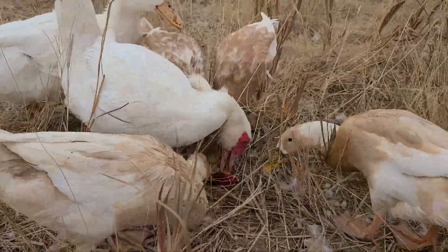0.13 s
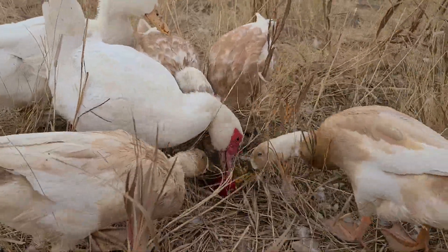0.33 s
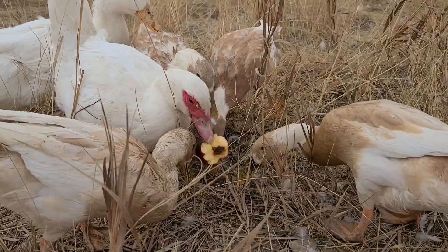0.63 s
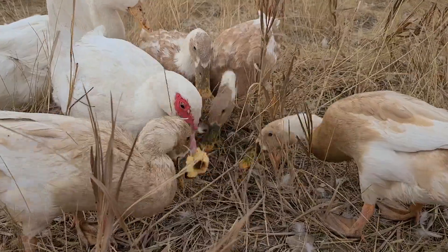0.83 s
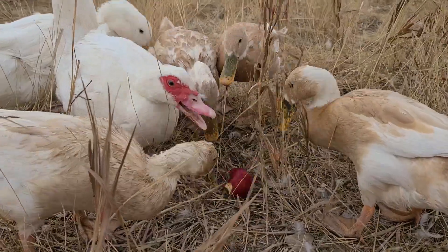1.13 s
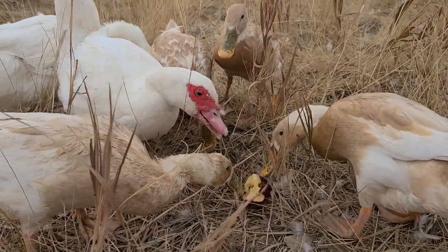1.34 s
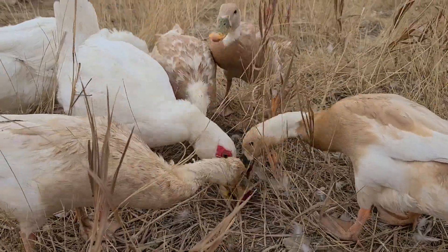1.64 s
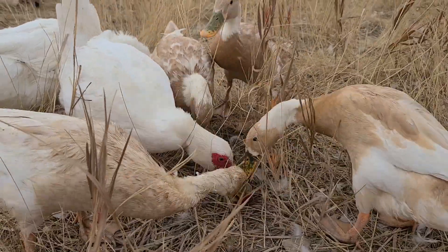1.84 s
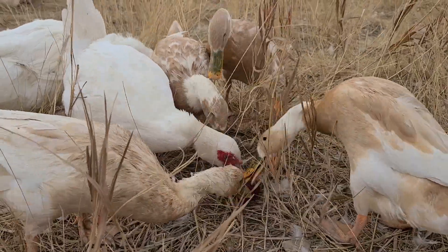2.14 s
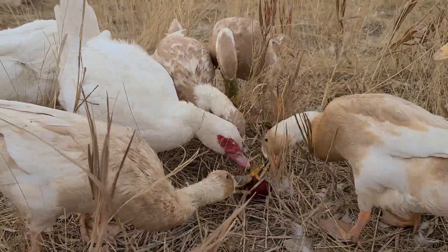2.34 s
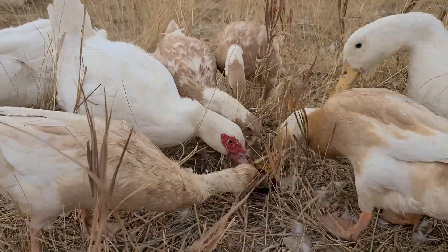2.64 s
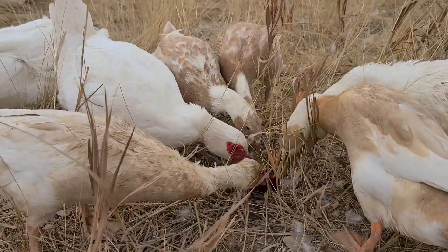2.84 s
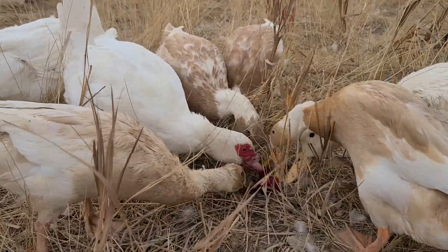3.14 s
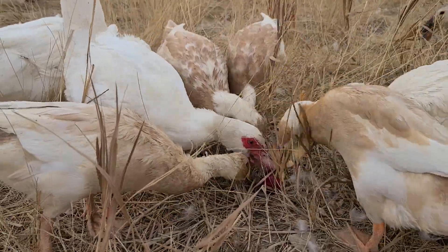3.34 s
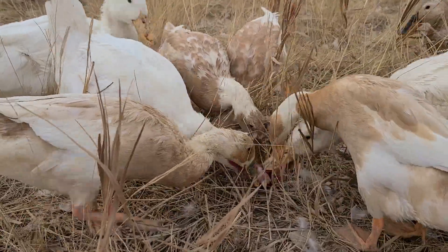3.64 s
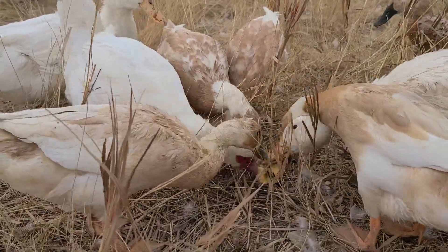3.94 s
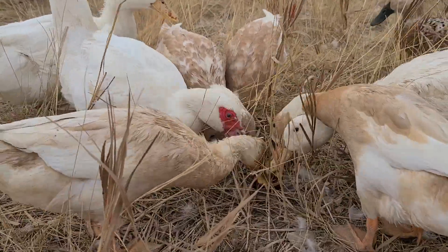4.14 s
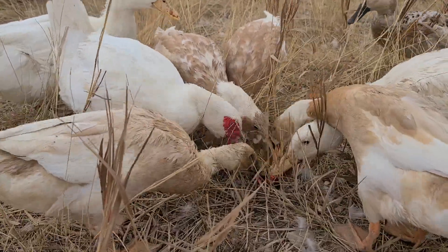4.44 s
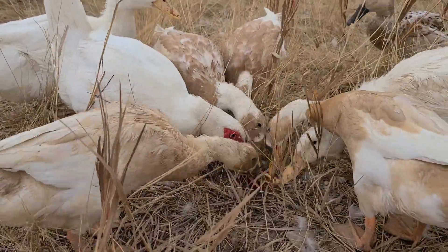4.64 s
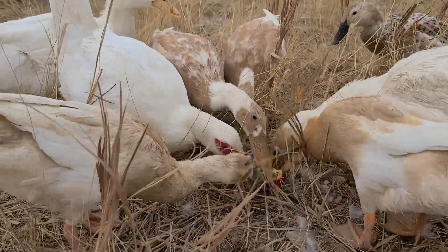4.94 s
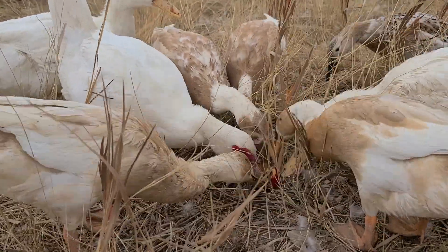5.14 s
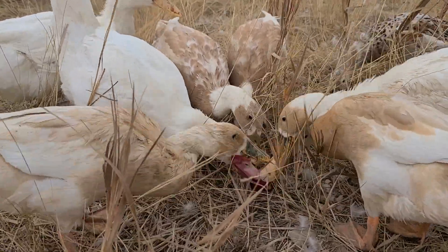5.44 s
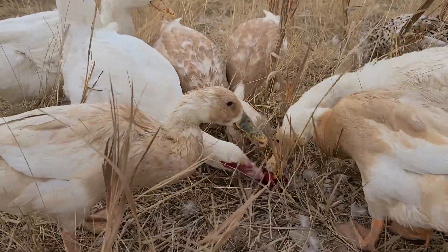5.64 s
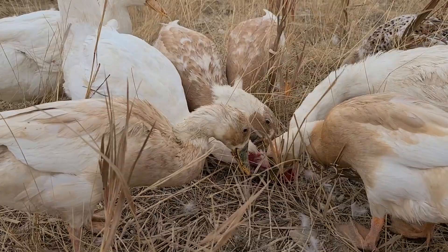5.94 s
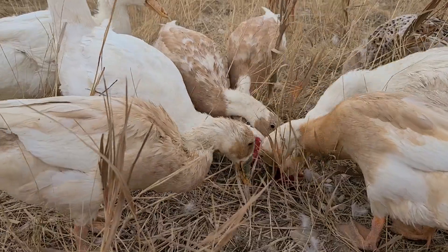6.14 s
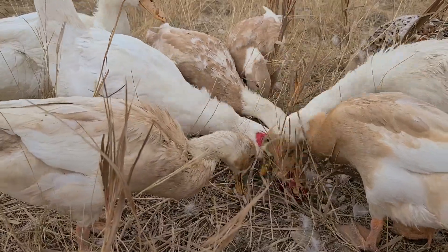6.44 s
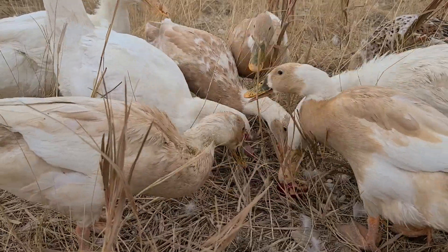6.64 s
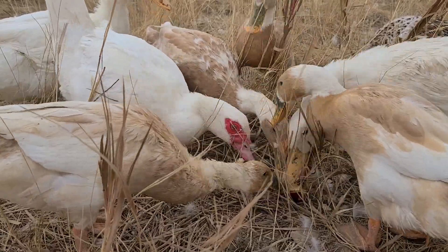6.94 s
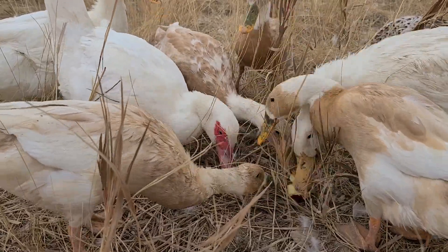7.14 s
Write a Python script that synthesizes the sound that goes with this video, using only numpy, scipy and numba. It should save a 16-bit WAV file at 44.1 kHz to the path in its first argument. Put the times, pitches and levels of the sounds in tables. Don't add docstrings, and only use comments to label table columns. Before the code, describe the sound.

About seven seconds of ducks feeding in dry grass, heard close up in stereo outdoors. Strong deep, buzzing quacks open at 0.1 and 0.26 seconds, followed by mellower ones at 0.33 and 0.77. A cracked, higher quack comes near 1.1, then sharp loud ones at 1.3 and 1.6. From 1.9 to 3.4 the calls are mostly small gliding whistles, faint quacks and hoarse, breathy rasps. Mellow quacks return around 3.6, 3.9, 4.4 and 4.7, then at 5.1, 5.6 and 6.0, with a brief one near 7.0. Throat pops, pecks and bill claps tick throughout. Straw rustles in bursts, busiest around 4.7 to 5.2, with crisp snaps clustered near 3.7 to 4.1. Low wind buffeting starts about 1.3, leaning left, grows across both sides, peaks at 4.5 and 5.0, and weakens after 6. Distant wheezy birds and soft field murmur remain underneath.

```python
import sys
import numpy as np
from scipy import signal
from scipy.fft import rfft, irfft
from scipy.io import wavfile
from scipy.ndimage import uniform_filter1d
from numba import njit

SR = 44100
rng = np.random.default_rng(int(sys.argv[2]) if len(sys.argv) > 2 else 0)


def invert_db(level):
    return 10 ** (np.asarray(level, dtype=float) / 20)


def wav_out(sig):
    wavfile.write(sys.argv[1], SR, np.round(np.clip(np.atleast_2d(sig).T, -1, 1) * 32767).astype(np.int16))


N = 321489


def level(x, db):
    return x * invert_db(db) / np.sqrt(np.mean(x ** 2))


@njit
def svf(x, hz, width):
    y, b, l = np.empty(len(x)), 0., 0.
    g, k = np.tan(np.pi * hz / SR), width / hz
    for i in range(len(x)):
        v = (b + g * (x[i] - l)) / (1 + g * (g + k))
        b, l, y[i] = 2 * v - b, l + 2 * g * v, k * v
    return y


def cascade(x, *bands):
    for hz, width_hz in bands:
        x = svf(x, float(hz), float(width_hz))
    return x


def resonate(x, modes):
    out = 0
    for k, (hz, width_hz, db) in enumerate(modes):
        out = out + (-1) ** k * invert_db(db) * cascade(x, (hz, width_hz))
    return out


def walk(rate_hz, size=N):
    k = int(SR / rate_hz)
    steps = np.repeat(rng.standard_normal(size // k + 1), k)
    return 1.6 * uniform_filter1d(uniform_filter1d(steps, k), k)[:size]


def colour(x, spectrum):
    hz, db = np.transpose(spectrum)
    bins_hz = np.arange(N // 2 + 1) * SR / N
    return irfft(rfft(x) * invert_db(np.interp(np.log(bins_hz + 1), np.log(hz), db)), N)


def add(out, start, x, lag, pan_db):
    size = min(len(x), N - start)
    late = np.interp(np.arange(size) - lag, np.arange(size), x[:size], left=0)
    out[:, start:start + size] += [x[:size] * invert_db(pan_db / 2), late * invert_db(-pan_db / 2)]


def swell(length_s, peak, size=5000):
    u = np.clip(np.arange(size) / (length_s * SR), 0, 1)
    peak = np.clip(peak, .05, .95)
    return u, np.sin(np.pi / 2 * np.where(u < peak, u / peak, (1 - u) / (1 - peak)))


def glide(u, first_hz, middle_hz, last_hz):
    return first_hz * (1 - u) * (1 - 2 * u) + 4 * middle_hz * u * (1 - u) + last_hz * u * (2 * u - 1)


def surges(times, peaks_db, rest_db, rise_db_s, fall_db_s):
    t = np.arange(0, N / SR + .01, .002)
    away = t[:, None] - np.array(times)
    db = np.array(peaks_db) + np.where(away < 0, rise_db_s * away, -fall_db_s * away)
    power = invert_db(rest_db) ** 2 + np.sum(invert_db(db) ** 2, axis=1)
    return np.interp(np.arange(N) / SR, t, 10 * np.log10(power))


def gusts_db():
    # peak t/s, left port level/dB, right port level/dB
    gusts = [(1.32, -37, -53), (1.58, -29, -41), (1.72, -33.5, -57), (1.94, -35, -44), (2.1, -32, -47),
             (2.26, -32, -30), (2.39, -28, -30.5), (2.53, -34.5, -36), (2.69, -29.5, -28.5),
             (2.96, -29.5, -37), (3.23, -39.5, -80), (3.5, -34, -35), (3.6, -27, -29), (3.72, -31, -30),
             (3.97, -29.5, -27.5), (4.11, -32, -30), (4.22, -27, -29), (4.471, -23, -24),
             (4.75, -33.5, -42), (4.9, -34, -33.5), (5.038, -22.5, -20.5), (5.24, -33, -38),
             (5.56, -30, -34.5), (5.85, -31, -29.5), (6.07, -33, -62), (6.2, -33.5, -41), (6.54, -45, -43),
             (6.96, -36.5, -52), (7.04, -50, -42), (7.13, -33.5, -58)]
    s, *ports_db = np.transpose(gusts)
    return np.array([surges(s, db, rest_db=-49.5, rise_db_s=200, fall_db_s=190) for db in ports_db])


def wind():
    # f/Hz, density/dB
    eddy_spectrum = [(12, -51), (20, -13), (54, -2.5), (85, -5.5), (115, -14), (182, -22), (255, -25),
                     (500, -30), (650, -68), (1100, -120)]
    db = gusts_db()
    eddies = level(colour(rng.standard_normal((2, N)), eddy_spectrum), 0.83)
    eddies = eddies / uniform_filter1d(eddies ** 2, size=3000) ** .25
    throb = invert_db(db + 2.5 * np.array([walk(12), walk(12)]))
    return colour(eddies * throb, [(110, 1.5), (300, -14.5)])


def field():
    # f/Hz, density/dB
    murmur_spectrum = [(71, -10), (120, 5), (217, 6.5), (361, -6), (471, -2), (1090, -7), (2370, -17.5),
                       (3490, -10), (5140, -23.5), (7130, -19.5), (11900, -19.5), (15800, -37)]
    murmur_db, follow_db_per_db = -55.5, 0.17
    mid, side = rng.standard_normal((2, N))
    breeze_db = np.mean(gusts_db(), axis=0)
    breeze_db = breeze_db - np.mean(breeze_db)
    side = colour(side, [(300, -17.5), (1400, -1.0)])
    murmur = colour(np.array([mid + side, mid - side]), [(60, -77)] + list(murmur_spectrum))
    return level(murmur, murmur_db + 3) * invert_db(1.5 * walk(6) + follow_db_per_db * breeze_db)


def far_flock():
    voices = []
    for hz in (1100, 1300, 1550):
        voices.append(cascade(rng.standard_normal(N), (hz, 120)) * invert_db(4 * walk(14)))
    return level(np.array([voices[0] + voices[1], voices[1] + voices[2]]), -63.5)


def straw():
    # peak t/s, level/dB
    stirs = [(.3, -50), (.65, -45.5), (1.13, -47.5), (1.34, -55), (1.61, -42.5), (1.99, -76), (2.16, -43.5),
             (2.5, -49.5), (2.84, -43), (3.3, -78), (3.65, -53), (3.81, -51), (4.07, -45), (4.4, -70),
             (4.69, -41), (4.98, -39.5), (5.16, -42.5), (5.65, -45.5), (6.29, -51), (6.42, -54),
             (6.57, -46.5), (6.82, -51), (7.02, -50.5)]
    # f/Hz, density/dB
    crackle_spectrum = [(2500, -3), (4500, 0), (5150, -5), (5900, 3), (7500, 3), (10000, 1), (12500, 1.5),
                        (15500, -0.5)]
    # t/s, peak level/dB, f/Hz
    snaps = [(1.992, -38, 4960), (2.503, -40, 4630), (4.493, -33, 4100), (6.875, -39, 3350),
             (2.7005, -48, 8100), (3.691, -33, 6440), (3.738, -31.5, 3930), (3.757, -42, 4000),
             (3.492, -39, 3500), (3.812, -31, 9700), (3.9736, -31, 4070), (4.038, -35, 3560),
             (4.672, -26, 4800), (4.0684, -35, 7500), (6.2846, -36, 4880), (6.312, -31, 8850),
             (6.408, -36, 12100), (6.563, -40, 6520), (6.816, -35, 9690), (7.169, -34, 3550)]
    stir_db = surges(*np.transpose(stirs), rest_db=-52.5, rise_db_s=197, fall_db_s=186)
    struck = rng.random((3, N)) < .2
    force = invert_db(2.6 * np.minimum(rng.exponential(size=(3, N)), 7))
    cracks = struck * force * rng.standard_normal((3, N))
    shared = np.array([cracks[2], np.roll(cracks[2], 12)])
    bed = level(colour(cracks[:2] + .5 * shared, crackle_spectrum), 0.74)
    fine = colour(bed, [(9000, -30), (10500, 0)])
    bed = (bed - fine) * invert_db(2.5 * walk(45)) + fine * invert_db(2.5 * walk(30))
    out = bed * invert_db(stir_db + np.array([[1.], [-1.]]))
    t = np.arange(400) / SR
    for s, db, hz in snaps:
        ring = cascade(rng.standard_normal(len(t)), (hz, 0.3 * hz), (hz, .35 * hz))
        snap = level(ring, -3.0) * np.exp(-t / 0.0035)
        add(out, int(s * SR), invert_db(db) * snap, 11.5, 1.5)
    return out


def whistle_rows():
    # t/s, length/s, start f/Hz, end f/Hz, peak level/dB
    falls = [(.085, 0.034, 738, 577, -31.5), (.236, 0.026, 980, 644, -32), (.31, .022, 1149, 1077, -17.5),
             (1.009, 0.038, 2016, 887, -40), (1.296, 0.027, 1494, 1155, -29),
             (1.582, 0.022, 1400, 1095, -20), (1.555, .024, 1450, 1100, -38),
             (2.062, .012, 1550, 1300, -49), (2.298, 0.021, 1250, 760, -45), (2.45, 0.02, 1250, 800, -37.5),
             (2.598, 0.029, 1136, 705, -35), (3.374, 0.038, 1230, 964, -35.5),
             (3.554, 0.03, 1620, 770, -36.5), (3.854, 0.028, 1002, 770, -26),
             (4.055, 0.017, 1460, 930, -33.5), (4.365, 0.029, 1020, 942, -30.5),
             (4.398, 0.024, 1243, 1050, -31.5), (4.48, 0.029, 1630, 980, -43.5),
             (4.617, 0.052, 1166, 950, -33), (4.661, 0.028, 1450, 1286, -28),
             (5.317, 0.024, 1223, 770, -36.5), (5.485, 0.037, 1324, 845, -35),
             (6.296, 0.01, 790, 420, -39.5), (7.001, 0.039, 1253, 663, -35), (7.193, 0.032, 987, 730, -33)]
    # t/s, length/s, start f/Hz, end f/Hz, peak level/dB
    droops = [(1.198, 0.028, 1864, 880, -40.5), (1.372, 0.032, 1654, 704, -30.5),
              (1.525, 0.053, 1716, 1510, -45.5), (1.928, 0.035, 1142, 690, -35),
              (2.12, .03, 1143, 710, -39), (2.278, 0.03, 1850, 900, -47), (2.438, 0.014, 1873, 1350, -42),
              (2.81, 0.022, 1050, 720, -35), (3.172, 0.043, 1060, 1000, -32),
              (3.718, 0.019, 1156, 675, -32), (4.115, 0.03, 2270, 2200, -49),
              (4.125, .022, 1720, 1680, -48.5), (5.808, 0.025, 1074, 655, -35.5),
              (6.497, 0.014, 617, 393, -39.5)]
    # t/s, length/s, top f/Hz, peak level/dB
    arches = [(0.575, 0.055, 1238, -31), (0.816, .043, 1121, -28), (1.168, 0.038, 1547, -44.5),
              (2.236, 0.065, 1630, -45.5), (2.015, 0.037, 1650, -55), (2.561, 0.035, 1122, -43.5),
              (2.395, 0.044, 1610, -49.5), (3.358, 0.024, 1470, -48), (3.576, .025, 1317, -27.5),
              (3.702, .031, 1473, -43), (4.034, .029, 1580, -40), (4.6, 0.025, 1456, -42),
              (5.593, .029, 1177, -23.5), (5.927, 0.031, 1290, -42), (5.949, 0.025, 1028, -23.5),
              (7.178, .028, 1360, -41)]
    for calls, left in ((falls, 0.285), (droops, 0.91)):
        for s, length_s, first_hz, last_hz, db in calls:
            yield s, length_s, first_hz, last_hz + left * (first_hz - last_hz), last_hz, db
    for s, length_s, top_hz, db in arches:
        yield s, length_s, 0.96 * top_hz, top_hz, 0.894 * top_hz, db


def whistles():
    out = np.zeros((2, N))
    for s, length_s, first_hz, middle_hz, last_hz, db in whistle_rows():
        u = np.linspace(-.1, 1.1, int(1.2 * length_s * SR))
        waver, flutter, breath = (walk(rate_hz, 4000)[:len(u)] for rate_hz in (250, 150, 700))
        hz = glide(u, first_hz, middle_hz, last_hz) * (1 + 0.011 * waver)
        phase = 2 * np.pi * np.cumsum(hz) / SR
        overtones = cascade(np.sin(2 * phase) + .15 * np.sin(3 * phase), (3500, 1300), (3500, 1300))
        tone = np.sin(phase) + .9 * overtones
        tone = tone * invert_db(2.5 * flutter) + .45 * breath * np.cos(phase)
        add(out, int((s - 0.12 * length_s) * SR), invert_db(db - 1.5) * np.hanning(len(u)) ** 0.4 * tone, 9, -2.5)
    return out


def quack_rows():
    # t/s, length/s, pulse rate f/Hz, chest level/dB, mouth resonance f/Hz
    deep_duck = [
        (.104, 0.05, 202.5, -25.5, 1075),
        (2.565, 0.063, 240.8, -48, 1010),
        (2.89, 0.051, 240.5, -46, 835),
    ]
    mellow_duck = [(.333, .051, 304.6, -27, 1175), (.767, 0.064, 350.6, -29, 1263),
                   (3.587, 0.061, 296, -27.5, 1303), (3.867, 0.05, 251.2, -25.5, 1137),
                   (4.398, .03, 264, -35.5, 1480), (4.66, 0.021, 227.2, -32.5, 1380),
                   (5.132, 0.058, 305, -31.5, 1415), (5.611, 0.053, 272.2, -26.5, 1217),
                   (5.965, 0.05, 253, -26, 1170), (7.032, 0.013, 214, -34, 1090)]
    sharp_duck = [
        (1.317, 0.057, 324.2, -29, 1450),
        (1.59, 0.059, 320.2, -29, 1470),
        (3.194, 0.0294, 347.3, -44.5, 1430),
    ]
    cracked_duck = [
        (1.082, .056, 463.4, -30.5, 1553),
    ]
    deep_shout = [
        (0.259, 0.068, 205, -24, 1116),
    ]
    # start above middle as share of later drop, end f/Hz, peak place 0-1,
    # mouth over chest/dB, bill over chest/dB
    voices = [(0.65, 198, 0.45, 11, -10.5), (.55, 208, 0.22, -2.5, -11), (0.602, 280, 0.38, 5, -3),
              (0.059, 80.5, 0.47, -3, -14), (0.81, 192, .1, 12, -7)]
    hoarseness = (0.3, 0.4, 0.4, 0.85, .17)
    # f/Hz, width/Hz, level/dB
    bills = [
        [(2230, 190, 8), (3500, 310, -1), (4100, 300, -4), (5500, 380, -10), (6900, 480, -25)],
        [(2140, 280, 1), (3100, 300, 2.5), (3550, 410, 1.5), (4140, 300, 0.5), (5950, 670, -12),
         (7500, 420, -9)],
        [(2150, 250, 2.5), (2800, 340, 0), (3700, 590, 2), (5020, 580, 1.5), (6740, 460, -2.5), (7740, 770, -5)],
        [(1990, 260, -4), (3380, 450, 0.5), (4100, 400, 5.5), (5700, 300, -12), (7500, 610, -18)],
        [(2430, 250, -1), (3500, 250, 3), (4100, 300, -3), (5600, 440, -14), (6900, 530, -15)],
    ]
    # mouth resonance width/Hz, steepness of swell, breath over voiced bill/dB
    manners = [(190, 1.1, -9), (420, 0.56, -1), (560, 1.1, -4), (400, .8, -2.5), (200, 0.38, -2)]
    usual_mouth_hz, usual_chest_db = 1300, -28
    mouth_opens_db, bill_opens_db = 1.5, 4.5
    effort_opens = 0.48
    ducks = (deep_duck, mellow_duck, sharp_duck, cracked_duck, deep_shout)
    for calls, voice, *traits in zip(ducks, voices, hoarseness, bills, manners):
        start, end_hz, peak, mouth_db, bill_db = voice
        for s, length_s, hz, db, mouth_hz in calls:
            wide = (mouth_hz - usual_mouth_hz) / 100
            push_db = effort_opens * (db - usual_chest_db)
            pitch = (hz + start * (hz - end_hz), hz, end_hz)
            mouth_out_db = mouth_db + push_db + mouth_opens_db * wide
            bill_out_db = bill_db + push_db + bill_opens_db * wide
            yield s, length_s, pitch, db, peak, mouth_hz, mouth_out_db, bill_out_db, *traits


def quacks():
    breath_lead_s, breath_tail_s = .016, 0.0083
    out = np.zeros((2, N))
    for s, length_s, pitch, db, peak, mouth_hz, mouth_db, bill_db, hoarse, bill_modes, manner in quack_rows():
        width_hz, steep, breath_db = manner
        u, effort = swell(length_s, peak)
        hz = glide(u, *pitch)
        effort = effort * invert_db(3 * hoarse * walk(200, len(hz)))
        phase = np.cumsum(hz * (1 + .06 * hoarse * walk(300, len(hz)))) / SR
        orders = np.arange(1, 46)[:, None]
        pulses = level(-np.sum(np.cos(2 * np.pi * orders * phase) * (orders * hz < 10000), axis=0), 0)
        air = level(np.exp(-(phase % 1) / .3) * rng.standard_normal(len(hz)), 0)

        second = 1.02 * np.exp(-((2 * hz - 570) / 210) ** 2)
        chest = -.8 * np.cos(2 * np.pi * phase) - second * np.cos(4 * np.pi * phase)
        chest = chest - 0.27 * np.cos(6 * np.pi * phase)

        mouth = cascade(pulses + 0.81 * hoarse * air, (mouth_hz, width_hz), (mouth_hz, width_hz))
        skirt = cascade(pulses, (0.79 * mouth_hz, 700), (0.89 * mouth_hz, 690))
        mouth = level(mouth, 0) + level(skirt, -9.5)

        modes = np.multiply(bill_modes, (1 + .025 * rng.standard_normal(), 1, 1))
        bill = resonate(pulses + 1.3 * hoarse * air, modes)
        bill = level(bill, 0) + .2 * hoarse * pulses

        breath = resonate(rng.standard_normal(len(hz)) * invert_db(4 * walk(150, len(hz))), modes)
        breath = level(breath, 0) * swell(length_s + breath_lead_s + breath_tail_s, 0.25)[1] ** 0.82

        start = int(s * SR)
        add(out, start, effort ** (steep * 0.38) * invert_db(db + 2.5) * chest, 6, -.6)
        add(out, start, effort ** steep * invert_db(db + mouth_db + 3.5) * level(mouth, 0), 10.5, -4.)
        add(out, start, effort ** (2.0 * steep) * invert_db(db + bill_db + 1.5) * level(bill, 0), 13.6, -2.5)
        add(out, int((s - breath_lead_s) * SR), invert_db(db + bill_db + breath_db) * breath, 13.6, -2.5)
    return out


def pops():
    # t/s, peak level/dB
    knocks = [(0.529, -56), (0.731, -52.5), (0.98, -50), (1.274, -47), (1.505, -54.5), (1.91, -50),
              (2.082, -52.5), (2.23, -53.5), (2.388, -53.5), (2.558, -54.5), (2.773, -53.5),
              (3.136, -53.5), (3.339, -53.5), (3.518, -53.5), (3.685, -53), (3.819, -54),
              (4.022, -49.5), (4.295, -56), (4.578, -54), (5.094, -50.5), (5.289, -53.5), (5.459, -50),
              (5.774, -51), (5.918, -49), (6.215, -58), (6.425, -55.5), (6.983, -47.5), (7.159, -52),
              (0.39, -46.5), (1.037, -53), (1.16, -51.5), (1.572, -52.5), (1.643, -44.5), (1.97, -53),
             (2.285, -56), (2.414, -58.5), (2.623, -55.5), (3.224, -49.5), (3.545, -48.5), (3.745, -63),
             (3.843, -53), (4.327, -53.5), (5.343, -46.5), (5.525, -49), (5.558, -53), (5.58, -52.5),
             (5.792, -57), (5.865, -59), (6.3, -60), (5.839, -48.5)]
    out, t = np.zeros((2, N)), np.arange(900) / SR
    for s, db in knocks:
        hz = 300 * invert_db(2.63 * rng.standard_normal())
        knock = -np.sin(2 * np.pi * hz * t) * np.exp(-t / 0.0031)
        edge = cascade(rng.standard_normal(len(t)), (650, 800), (650, 800))
        edge = level(edge, -5) * np.exp(-t / .004)
        add(out, int(s * SR), invert_db(db + 21.5) * (knock + edge), 8, -1.5)
    return out


def rasps():
    # t/s, length/s, level/dB, upper resonances over it/dB, throat size (factor on resonances)
    calls = [(0.534, 0.085, -37, -13, 0.98), (0.75, 0.12, -40.5, -9.5, 0.93),
             (1.067, 0.072, -41, -1, 1.207), (1.234, 0.18, -44.5, -11.5, 0.85),
             (1.889, 0.082, -40.5, -10, 0.95), (2.109, 0.099, -38.5, -8, 0.98),
             (2.584, 0.039, -51, 0, 0.87), (2.436, 0.024, -55, 4, 1.13), (3.358, 0.066, -62, 3, 1.04),
             (3.466, 0.024, -48.5, -18, 0.66), (4.038, 0.068, -50, -15, 0.45),
             (4.109, 0.046, -54, -15, 1.05), (4.275, 0.032, -44, -22, 0.62), (4.355, 0.087, -48, -8, 0.95),
             (4.608, 0.054, -53.5, -1.5, 1.14), (4.674, 0.059, -41, -9, 0.995),
             (4.933, 0.06, -36.5, -12, 0.98), (5.098, 0.11, -40.5, -10, 0.82), (5.291, 0.092, -48, -8.5, 1),
             (5.545, 0.11, -42, -4.5, 0.92), (5.769, 0.082, -40.5, -2, 0.97),
             (6.434, 0.074, -40.5, -8, 0.89), (6.564, 0.052, -44.5, -19, 0.84),
             (5.855, 0.034, -55, -14, .7), (1.372, 0.041, -46.5, -11, 1.1)]
    # f/Hz, width/Hz, level/dB
    low_modes = [(1640, 120, 0), (2200, 220, -5), (1150, 150, -14)]
    # f/Hz, width/Hz, level/dB
    high_modes = [(2800, 220, 0), (3350, 300, -5), (4700, 450, -8), (5300, 300, -11)]
    sag = .14
    out = np.zeros((2, N))
    for s, length_s, db, upper_db, throat in calls:
        u, effort = swell(length_s, peak=0.45)
        phase = np.cumsum(95 * invert_db(0.92 * walk(80, len(u)))) / SR
        flaps = .1 + np.exp(-(phase % 1) / .2)
        direct, *scattered = flaps * rng.standard_normal((3, len(u)))
        start = int(s * SR)
        size = min(len(u), N - start)
        for port, lag in enumerate((0, 16)):
            air = np.roll(direct, lag) + 0.75 * scattered[port]
            low = cascade(resonate(air, np.multiply(low_modes, (throat, 1, 1))), (1400, 1240))
            high = cascade(resonate(air, np.multiply(high_modes, (throat, 1, 1))), (3580, 3400))
            voice = level(low, 1.56) + invert_db(upper_db) * level(high, 3.4)
            voice = np.interp(np.cumsum(1 + sag * (.5 - u)), np.arange(len(u)), voice)
            out[port, start:start + size] += (effort ** 1.2 * invert_db(db + 4.0) * voice)[:size]
    return out


def scene():
    voices = quacks() + whistles() + rasps() + pops()
    t = np.arange(3000) / SR
    tail = rng.standard_normal((2, len(t))) * np.exp(-t / 0.0084) * (t > .002)
    scatter = signal.fftconvolve(voices, invert_db(-28.0) * tail, axes=1)[:, :N]
    return voices + scatter + straw() + far_flock() + wind() + field()


def low_pass(x):
    return signal.sosfilt(signal.butter(12, 15870, fs=SR, output="sos"), x)


def record(dry):
    mix = np.tanh(dry)
    return low_pass(mix)


dry = scene()
out = record(dry)
wav_out(out)
```